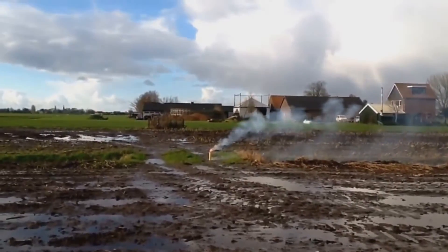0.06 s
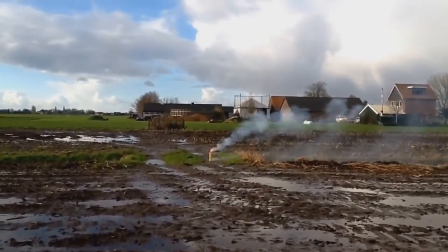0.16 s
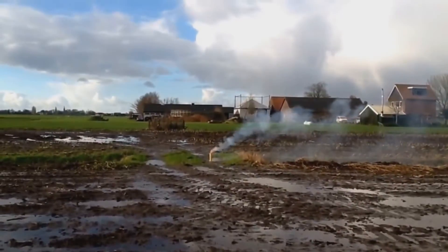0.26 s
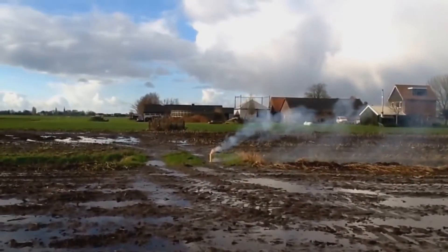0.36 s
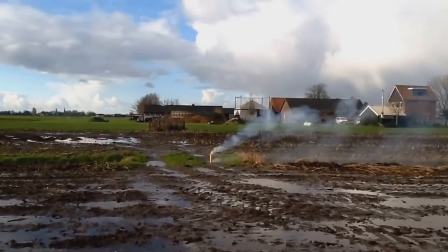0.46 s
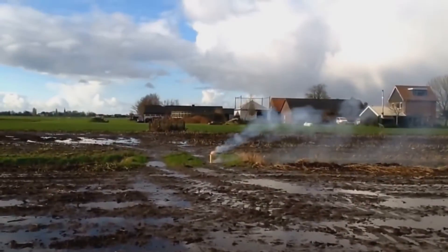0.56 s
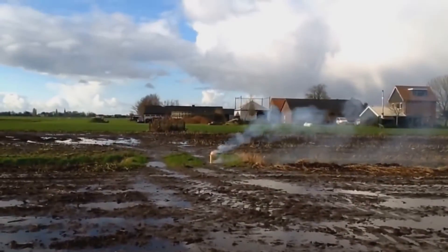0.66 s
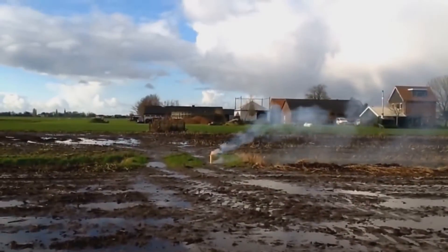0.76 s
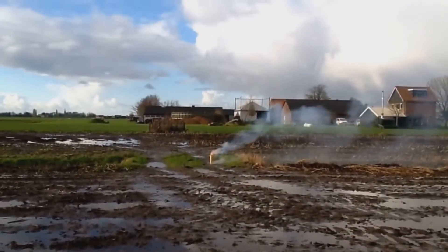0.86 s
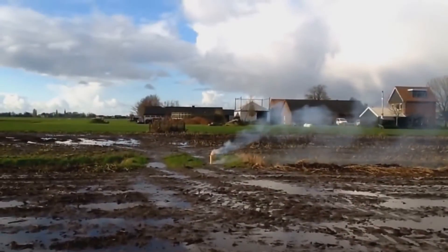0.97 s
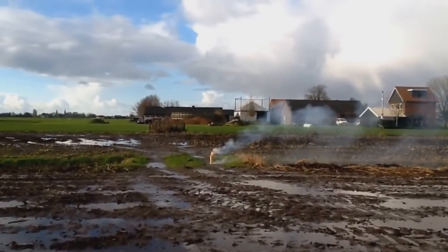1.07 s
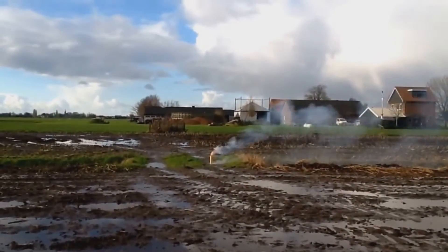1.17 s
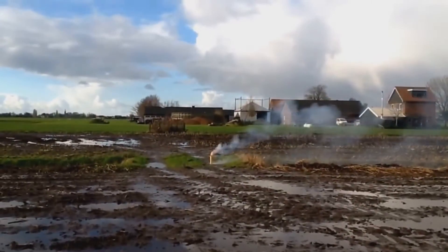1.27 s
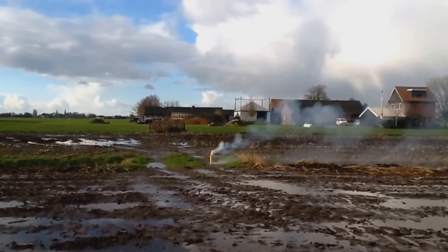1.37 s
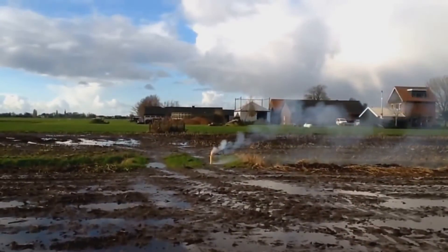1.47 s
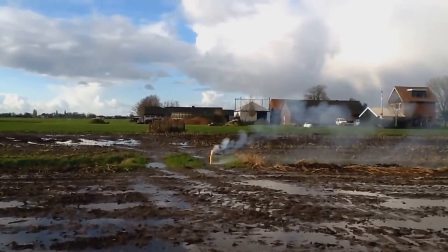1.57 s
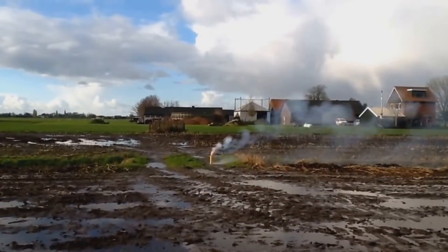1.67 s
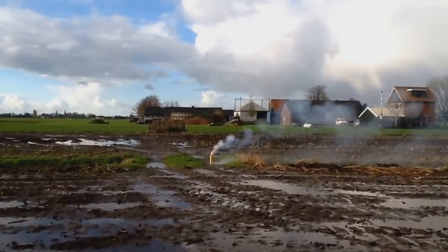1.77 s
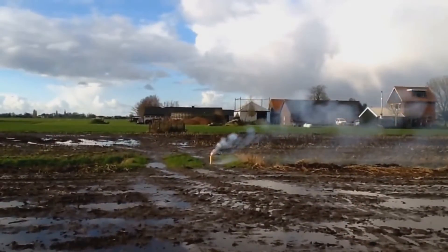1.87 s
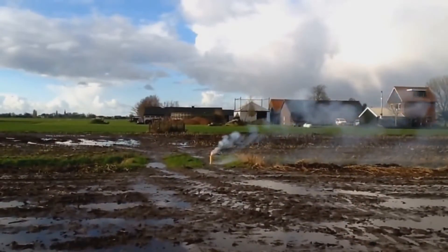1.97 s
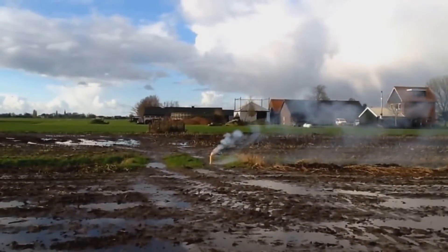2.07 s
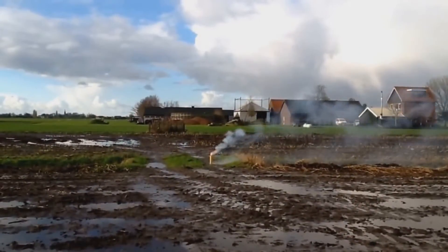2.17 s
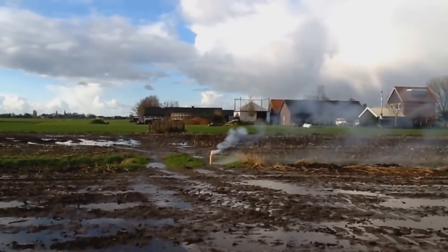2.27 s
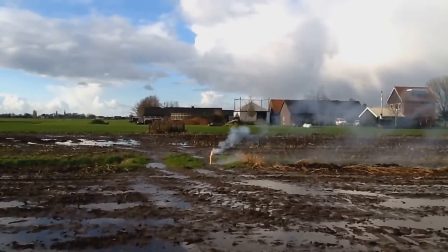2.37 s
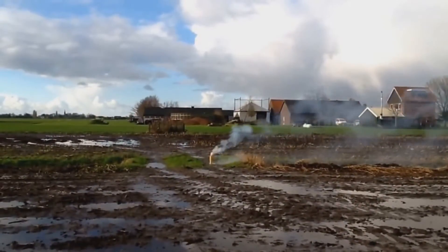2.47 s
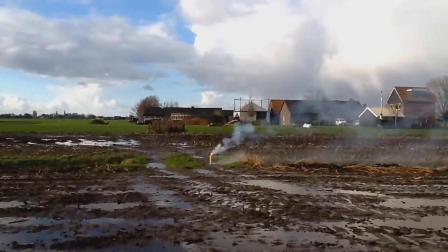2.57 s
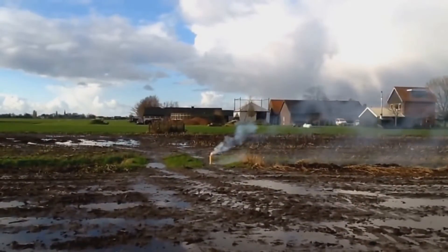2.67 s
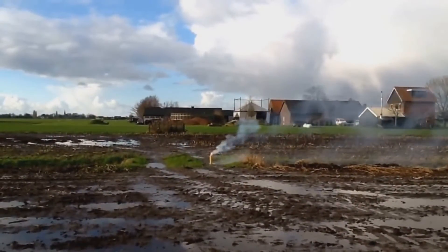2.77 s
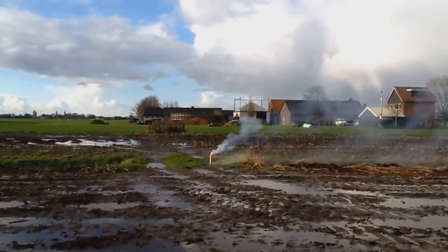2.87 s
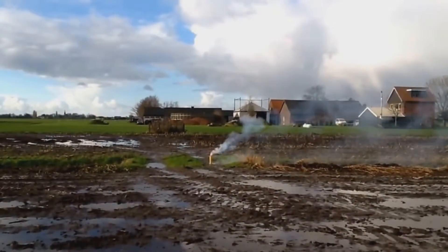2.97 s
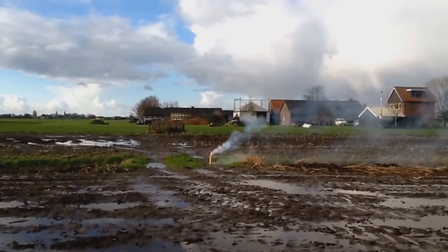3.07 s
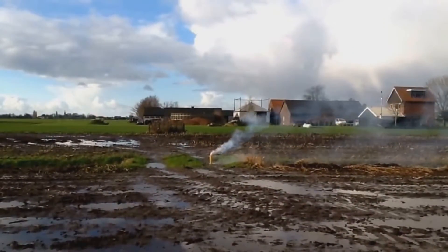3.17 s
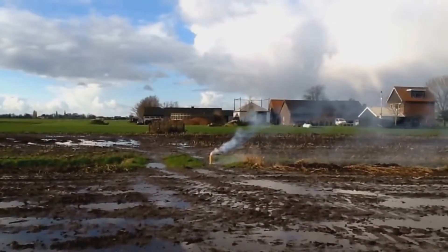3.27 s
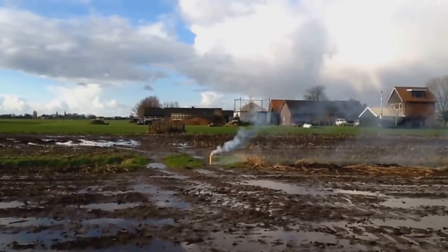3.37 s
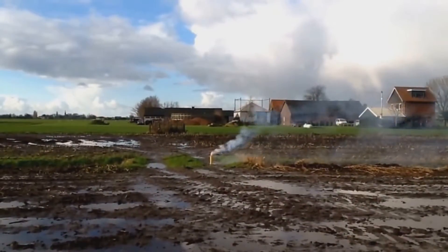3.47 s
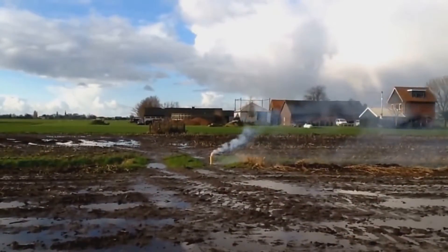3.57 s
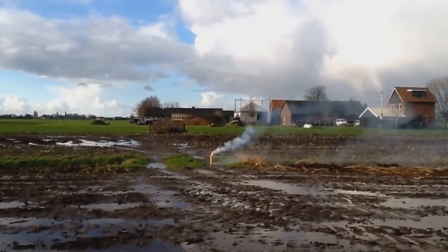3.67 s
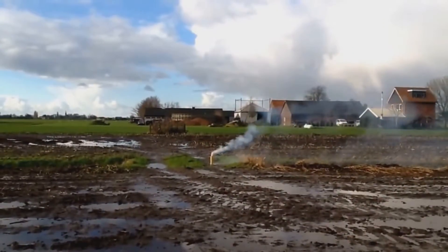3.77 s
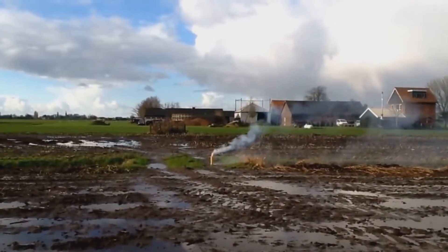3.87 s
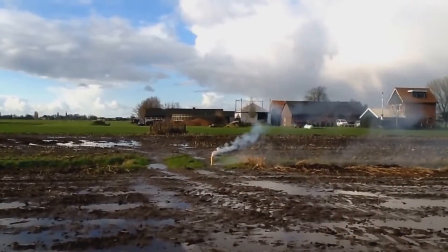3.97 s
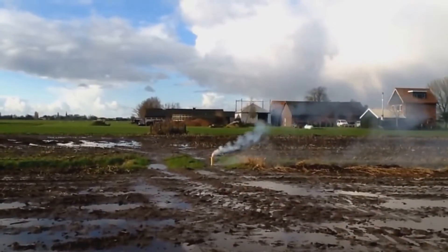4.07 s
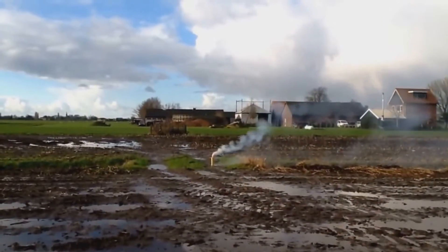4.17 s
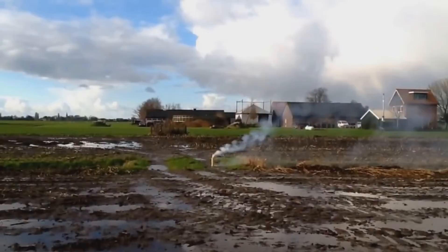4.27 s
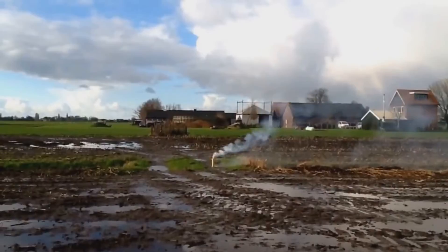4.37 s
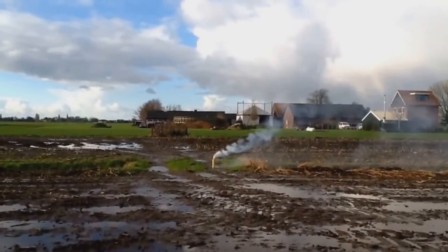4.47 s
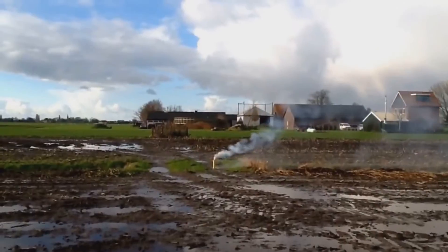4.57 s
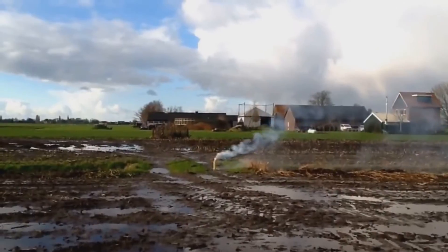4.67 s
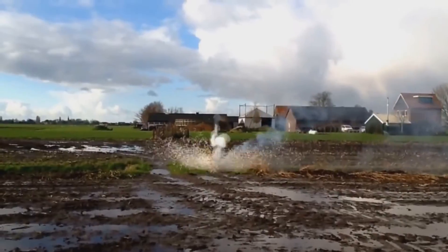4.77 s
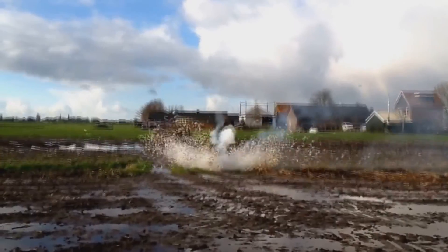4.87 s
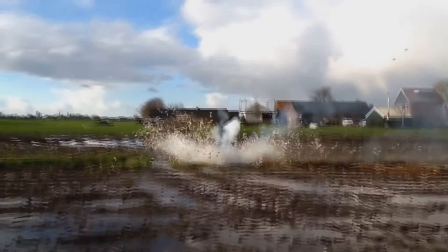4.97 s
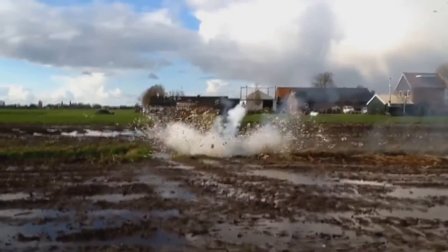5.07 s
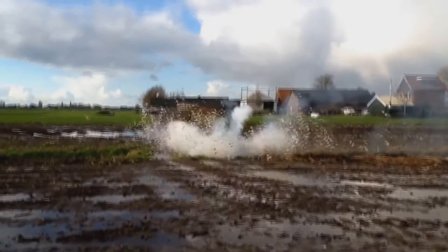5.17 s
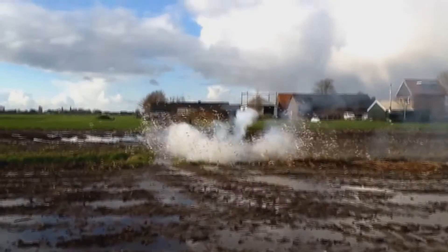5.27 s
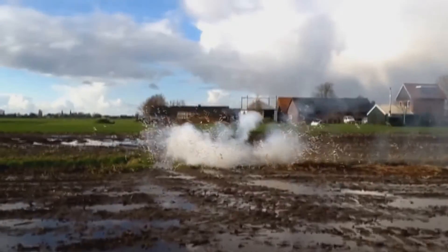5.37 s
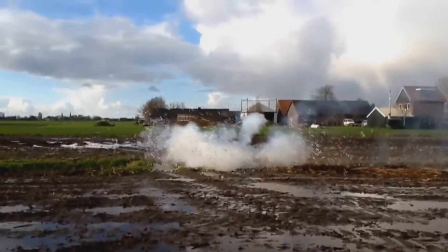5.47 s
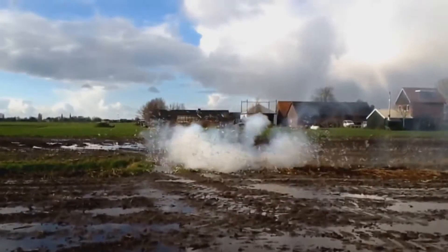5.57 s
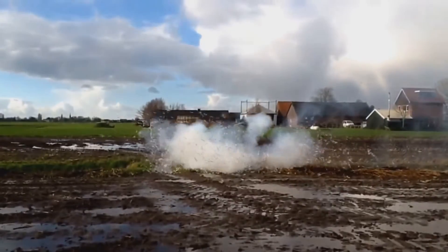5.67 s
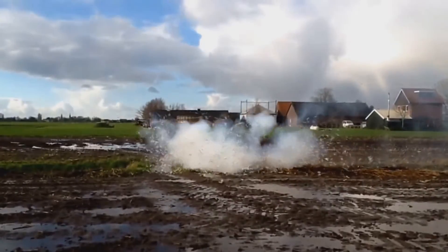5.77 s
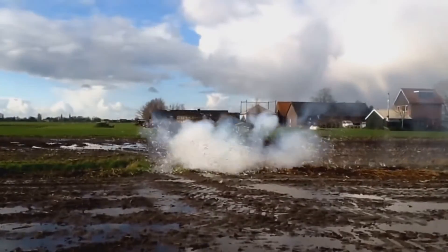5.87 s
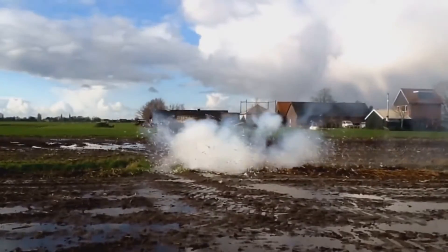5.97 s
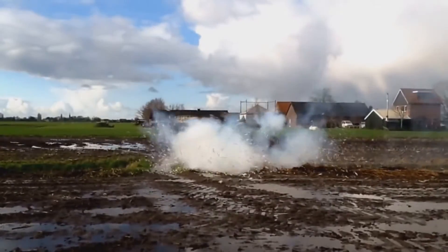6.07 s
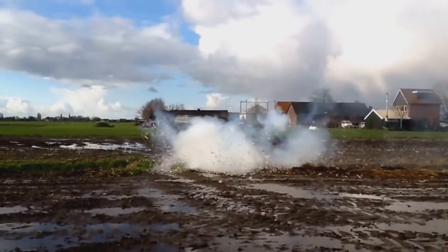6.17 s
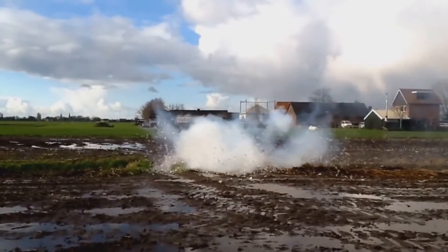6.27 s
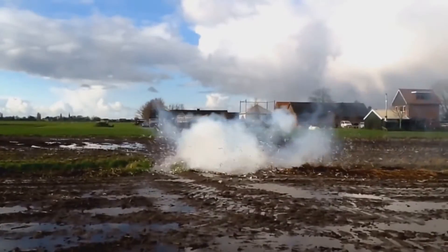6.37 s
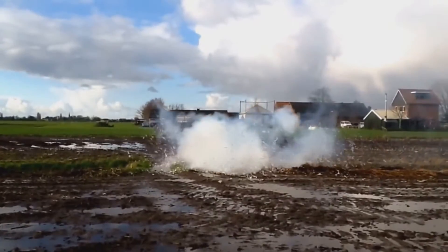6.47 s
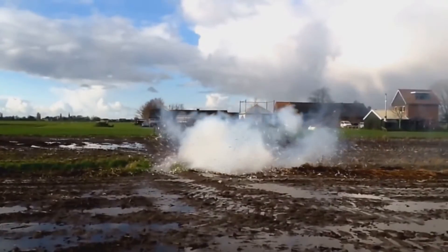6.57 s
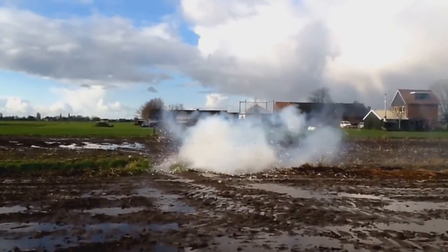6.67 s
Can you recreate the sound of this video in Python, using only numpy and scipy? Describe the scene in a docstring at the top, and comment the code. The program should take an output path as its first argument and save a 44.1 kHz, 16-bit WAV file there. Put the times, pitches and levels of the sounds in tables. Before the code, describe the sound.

From the start, the fuse of a big firecracker crackles in an open, wet field. It spits sharp, bright, irregular snaps over a fine sputter and a very soft hiss, with a faint, distant rumble underneath. The strongest snaps come between about 2.3 and 3.6 seconds. At about 4.9 seconds the crackling ends and the firecracker explodes with a single very loud crack and thump. The peak slightly overloads the small microphone, which misses the deepest bass. The blast scatters over the rough ground and quickly grows duller. From about 5.3 to 5.7 seconds a cluster of thumping, grainy echoes slaps back from farm buildings and trees, then a low roll fades over the fields. From about 6 seconds to the end, a few bits of dirt land with faint, high ticks as the roll dies away.

```python
"""A wet, open field, where a big firecracker burns over a faint, distant rumble.
Its fuse spits sharp little shock waves, each followed by its reflection from the ground.
The charge then explodes in a steep pressure front, a crack and a thump. The blast scatters off the
rough ground, slaps back from farm buildings and trees and rolls away; a few bits of dirt fall."""
import sys
import numpy as np
from scipy import signal
from scipy.fft import rfft, irfft
from scipy.io import wavfile

SR = 44100
rng = np.random.default_rng(int(sys.argv[2]) if len(sys.argv) > 2 else 0)


def to_wav(sig):
    """Store sig (one row per channel, or 1-D mono) as 16-bit WAV at the path in sys.argv[1].

    Samples outside -1..1 are clipped; the rate is SR.
    """
    pcm = np.clip(np.atleast_2d(sig), -1, 1) * 32767
    pcm = np.round(pcm).astype(np.int16)
    wavfile.write(sys.argv[1], SR, pcm.T)  # frames by channels


N = 296793
TIME = np.arange(N) / SR
BLAST_S = 4.9122

# spectrum of the distant background: f/Hz, relative density/dB
RUMBLE_SPECTRUM = [(12, -71.5), (20, -38.5), (60, -22.5), (96, -8.5), (193, 1), (367, -7.5), (422, -12.5),
                   (642, -6), (849, -14.5), (1570, -16.5), (2820, -26), (3840, -29), (10800, -33),
                   (14700, -34.5), (16000, -34.5)]
# dirt landing: t/s, peak level/dB, f/Hz
DIRT_IMPACTS = [(6.061, -32, 6100), (6.134, -43, 6100), (6.197, -41.5, 5960), (6.243, -44, 6000),
                (6.386, -41, 6000)]
# loud spits of the fuse: t/s, peak level/dB, f/Hz, damping (1/Q), ground reflection delay/s
FUSE_SPITS = [(0.0425, -27.0, 4900, 0.55, 0.00038), (0.3567, -12.5, 2100, 0.9, 0.00044),
              (0.3794, -16.0, 5800, 1.1, 0.0003), (0.6202, -11.5, 3900, 1.4, 0.00032),
              (0.6412, -14.0, 3880, 0.7, 0.00034), (0.6877, -20.0, 5800, 1.1, 0.00016),
              (0.8296, -18.0, 2800, 1.1, 0.00012), (0.937, -14.5, 10000, 1.4, 0.0002),
              (1.0722, -23.0, 6700, 1.4, 0.00028), (1.1053, -13.0, 5300, 1.8, 0.00014),
              (1.1184, -17.5, 6700, 1.8, 0.00042), (1.1558, -25.0, 6200, 1.1, 0.00014),
              (1.1796, -10.0, 10000, 2.3, 0.00024), (1.236, -23.5, 9200, 0.7, 0.00048),
              (1.2925, -20.5, 7900, 0.9, 0.00036), (1.3655, -20.0, 7300, 0.9, 0.00048),
              (1.4877, -22.0, 8500, 1.8, 0.00012), (1.501, -16.5, 6200, 1.4, 0.00042),
              (1.5895, -24.0, 7900, 1.1, 0.00014), (1.6785, -22.0, 6200, 0.7, 0.00048),
              (1.8492, -11.0, 6200, 0.7, 0.00032), (1.8813, -23.5, 5300, 1.1, 0.00014),
              (1.9363, -32.0, 1800, 0.55, 0.00052), (1.9926, -25.0, 9200, 1.1, 0.00022),
              (2.0101, -15.0, 6700, 0.7, 0.00016), (2.0647, -13.5, 7900, 0.7, 0.00016),
              (2.1489, -18.0, 8500, 0.55, 0.0003), (2.2559, -7.0, 6150, 0.87, 0.0004),
              (2.3293, -17.5, 6700, 1.8, 0.00026), (2.3507, -24.5, 7900, 0.9, 0.00016),
              (2.444, -2.5, 4600, 1.4, 0.0004), (2.4567, -13.0, 5300, 0.9, 0.00012),
              (2.4884, -16.5, 6700, 0.7, 0.00028), (2.5357, -25.5, 7900, 0.9, 0.00016),
              (2.6444, -10.0, 6200, 0.7, 0.00028), (2.6951, -24.5, 9200, 1.4, 0.0003),
              (2.9319, -8.0, 3900, 0.95, 0.00032), (3.0378, -23.0, 7900, 1.1, 0.00014),
              (3.0636, -23.0, 6700, 0.9, 0.00048), (3.0971, -12.5, 4600, 1.1, 0.00048),
              (3.142, -12.0, 3900, 1.8, 0.0004), (3.2505, 2.0, 4600, 0.7, 0.00012),
              (3.3319, -20.5, 4200, 0.9, 0.00014), (3.3663, -7.5, 6660, 0.9, 0.0004),
              (3.3719, -14.5, 6200, 0.58, 0.00036), (3.5, -4.5, 3900, 0.9, 0.00016),
              (3.5605, -8.5, 3600, 1.1, 0.00038), (3.6593, -16.0, 5300, 1.8, 0.00044),
              (3.7793, -16.5, 3600, 1.4, 0.00032), (3.8168, -20.5, 7900, 0.55, 0.00042),
              (3.8548, -20.5, 3600, 0.9, 0.0001), (3.9434, -20.5, 4900, 1.4, 0.0004),
              (3.9918, -7.5, 4900, 0.4, 0.0001), (4.0341, -24.5, 10100, 0.9, 0.00022),
              (4.3026, -18.0, 5800, 1.8, 0.00014), (4.3094, -25.5, 5300, 0.3, 0.00018),
              (4.3334, -13.0, 6200, 0.9, 0.0001), (4.3551, -17.5, 2800, 1.1, 0.0004),
              (4.412, -23.0, 4600, 1.1, 0.0001), (4.4451, -23.0, 1400, 0.3, 0.00018),
              (4.4568, -19.0, 6200, 0.9, 0.00012), (4.4781, -18.0, 10000, 2.2, 0.00042),
              (4.5692, -27.5, 9200, 1.1, 0.0003), (4.5992, -25.5, 5800, 1.1, 0.00012),
              (4.7024, -5.0, 3100, 1.8, 0.0004), (4.8201, -18.0, 3100, 0.7, 0.00012),
              (4.8731, -15.5, 9200, 0.9, 0.00048)]
# spectrum of the low roll over the fields: f/Hz, relative density/dB
ROLL_SPECTRUM = [(24, -59), (50, -42), (80, -22), (125, 1), (205, -0.5), (280, -4), (350, -14), (480, -18),
                 (640, -16), (900, -28.5), (1500, -32.5), (2500, -42), (4000, -72)]
# spectrum of the diffuse echo from the farm and its trees: f/Hz, relative density/dB
FARM_SPECTRUM = [(200, -25), (350, -0.5), (600, -11.5), (900, -12), (1900, -16), (2600, -17), (4000, -22),
                 (7000, -32.5), (10000, -44), (15000, -69)]
# bursts reflected by houses and barns: t/s, level/dB
BUILDING_ECHOES = [(5.404, -22), (5.486, -22.5), (5.572, -34), (5.633, -35), (5.682, -37.5)]
# gliding rings from ribbed walls and tiled roofs: t/s, duration/s, level/dB, start f/Hz, end f/Hz
RIB_RINGS = [(5.402, 0.023, -36, 3820, 3600), (5.423, 0.029, -28, 1852, 2255),
             (5.508, 0.032, -35, 3900, 2830), (5.635, 0.016, -40, 4050, 3560),
             (5.648, 0.037, -41, 2880, 3110)]
# spectrum of the blast scattered by nearby ground: f/Hz, relative density/dB
GROUND_SPECTRUM = [(30, -47), (60, -24), (100, -9), (150, -3), (330, -1), (480, -8.5), (700, -4),
                   (1100, -7.5), (1800, -9), (3000, -13), (6000, -16), (10600, -20), (15000, -31.5),
                   (16000, -43.5)]
# dulling with path length: f/Hz, exponent of the extra decay (negative: the band lingers)
GROUND_DECAY = [(100, -0.39), (300, -0.22), (700, -0.15), (2000, 0.16), (5000, 0.49), (10000, 0.99),
                (15000, 1.05)]
# the blast and its distinct echoes: t/s, thump level/dB, thump f/Hz, crack level/dB, crack top f/Hz
BLAST_ARRIVALS = [(4.9063, -19, 181, -4.5, 13000), (5.1143, -12, 174, -10, 7000),
                  (5.2370, -15.5, 153, -31.5, 1000), (5.319, -11, 504, -25.5, 5000),
                  (5.3725, -9, 570, -19, 1600), (5.4368, -11, 740, -12.5, 1660),
                  (5.4389, 2.5, 146, -15, 1470), (5.5098, -7, 358, -32, 3000),
                  (5.5149, -5.5, 169, -35, 3000), (5.5477, -12.5, 193, -24, 2000),
                  (5.583, -9, 218, -18.5, 794), (5.612, -21, 300, -21, 2000), (5.642, -23, 251, -18, 2400),
                  (5.645, -3.5, 167, -36, 2400), (6.056, -29, 190, -59, 700), (6.298, -31.5, 122, -65, 700)]


def from_db(db):
    """Amplitude ratio of a level in decibels."""
    return 10 ** (np.asarray(db) / 20)


def unit_rms(x):
    """Normalisation to an rms of 1."""
    return x / np.sqrt(np.mean(x ** 2) + 1e-20)


def at_hz(points, hz):
    """Interpolation of a table on a logarithmic frequency axis."""
    f, value = np.transpose(points)
    return np.interp(np.log(hz), np.log(f), value)


def cut(x, hz, kind, order=2):
    """Butterworth low-pass or high-pass filtering."""
    return signal.sosfilt(signal.butter(order, hz, kind, fs=SR, output="sos"), x)


def noise(spectrum):
    """Spectral shaping of white noise, rms 1."""
    hz = np.arange(N // 2 + 1) * SR / N + 1
    return unit_rms(irfft(rfft(rng.standard_normal(N)) * from_db(at_hz(spectrum, hz)), N))


def waver(hz):
    """Random fluctuation of rms 1, interpolated between hz values a second."""
    knots = rng.standard_normal(int(N / SR * hz) + 2)
    return unit_rms(np.interp(TIME * hz, np.arange(len(knots)), knots))


def bands(x, edges):
    """Zero-phase separation into adjacent bands: yields (top edge/Hz, band)."""
    for hz in edges:
        band = signal.sosfiltfilt(signal.butter(6, hz, fs=SR, output="sos"), x)
        x = x - band
        yield hz, band


def add(out, s, sound):
    """Linear superposition of a sound starting at time s."""
    start = int(round(s * SR))
    out[start:start + len(sound)] += sound[:N - start]


def echo_shape(start_s, attack_s, hold_s, fall_db_per_s, knee_s=1, power=0):
    """Linear rise and hold, then exponential decay times a power law past the knee."""
    rise = np.clip((TIME - start_s) / attack_s, 0, 1)
    age = np.maximum(TIME - start_s - attack_s - hold_s, 0)
    return rise * from_db(-fall_db_per_s * age) * (1 + age / knee_s) ** -power


def distant_rumble(level_db=-53):
    """Stationary noise, strongest in the bass, forms the background."""
    return from_db(level_db) * noise(RUMBLE_SPECTRUM)


def snap(hz, damping, body_share, bounce_s, bounce_share, body_hz=900):
    """A tiny shock, a damped swing with a slower recovery, interferes with its ground reflection."""
    t = np.arange(256) / SR
    phase, slow = 2 * np.pi * hz * t, 2 * np.pi * body_hz * t
    wave = -np.cos(phase) * np.exp(-phase * damping / 2) - body_share * (1 - slow) * np.exp(-slow)
    wave[0] /= 2   # the front falls on the first sample
    wave = wave + bounce_share * np.interp(t - bounce_s, t, wave, left=0)
    wave = cut(cut(wave, 400, "high"), 12500, "low")
    return wave / np.abs(signal.hilbert(wave)).max()


def snaps(rows, rubble_db=-14, rubble_s=0.0019, rubble_hz=2000):
    """Scattering by nearby soil colours each snap differently; a row is t/s, level/dB, snap's shape."""
    out, t = np.zeros(N), np.arange(256) / SR
    rubble = rng.standard_normal((len(rows), len(t))) * t * np.exp(-2 * t / rubble_s)
    for (s, db, *shape), lumps in zip(rows, cut(rubble, rubble_hz, "high")):
        paths = from_db(rubble_db) * lumps / np.linalg.norm(lumps) + (t == 0)
        add(out, s, from_db(db) * np.convolve(snap(*shape), paths))
    return out


def clod_scatter(x, tail_db=-11.5, knee_s=.0016, length_s=0.082, top_hz=9000, uneven_db=6.0):
    """Diffuse reflection from clods and ruts adds a fading spray of tiny, duller echoes."""
    t = np.arange(int(length_s * SR)) / SR
    sign, size = rng.standard_normal((SR // 2, 2))[:len(t)].T
    spray = cut(sign * from_db(uneven_db * size), top_hz, "low", order=1)
    spray *= (1 - t / length_s) / (1 + t / knee_s)
    return x + from_db(tail_db) * signal.fftconvolve(x, spray / np.linalg.norm(spray))[:N]


def falling_dirt(crumb_db=-52, spread_db=5, crumbs_from_s=6.7, count=14):
    """The impact of each thrown-up bit radiates a tick; finer crumbs land last."""
    crumbs = [(crumbs_from_s + when * (TIME[-1] - crumbs_from_s),
               crumb_db + spread_db * size, 4000 + 4000 * pitch)
              for when, size, pitch in rng.random((count, 3))]
    shape = (1.2, .1, .0003, .3)   # damping, body share, bounce delay/s, bounce share
    return clod_scatter(snaps([(s, db, hz, *shape) for s, db, hz in list(DIRT_IMPACTS) + crumbs]))


def spits(weak_db=-35, range_db=8, weak_hz=7000, longest_bounce_s=.0006, count=16):
    """Loud spits and weak random ones; path difference delays the reflection of a higher spark more."""
    weak = [(when * BLAST_S, weak_db + range_db * (size - .5), weak_hz * 2 ** (pitch - .5),
             .8, longest_bounce_s * height)
            for when, size, pitch, height in rng.random((count, 4))]
    body_share, bounce_share = .06, .45
    return snaps([(s, db, hz, damping, body_share, bounce_s, bounce_share)
                  for s, db, hz, damping, bounce_s in list(FUSE_SPITS) + weak])


def fuse(grain_db=-48, spread_db=4.5, grain_hz=7500, hiss_db=-70, count=190):
    """Combustion of the powder radiates a fine sputter and hiss beneath the spits until the blast."""
    sputter = [(when * BLAST_S, grain_db - spread_db * np.log(size + 0.027),
                grain_hz * 2 ** (pitch - .5), 1, .1, 0.00049 * height, .5)
               for when, size, pitch, height in rng.random((count, 4))]
    hiss = unit_rms(cut(cut(rng.standard_normal(N), 5000, "high"), 10000, "low"))
    return clod_scatter(spits() + snaps(sputter)) + from_db(hiss_db) * hiss * (TIME < BLAST_S)


def low_roll(field_db=-26.5, farm_db=-25.0, uneven_db=1.6, uneven_hz=28):
    """Reverberation: bass returns unevenly from the field, then the farm, and outlasts other echoes."""
    field = from_db(field_db) * echo_shape(4.96, attack_s=0.097, hold_s=.1, fall_db_per_s=22)
    farm = from_db(farm_db) * echo_shape(5.41, attack_s=.08, hold_s=.14, fall_db_per_s=3,
                                         knee_s=.2, power=2.05)
    uneven = from_db(uneven_db * np.clip(waver(uneven_hz), -2, 1))
    return np.hypot(field, farm) * uneven * noise(ROLL_SPECTRUM)


def farm_envelope(trees_db=-34.5):
    """Incoherent addition: a long return from the trees and a burst from each building sum in power."""
    trees = from_db(trees_db) * echo_shape(5.385, attack_s=.02, hold_s=.245, fall_db_per_s=75)
    walls = [from_db(db) * echo_shape(s, attack_s=0.01, hold_s=0.0023, fall_db_per_s=264)
             for s, db in BUILDING_ECHOES]
    return np.linalg.norm([trees] + walls, axis=0)


def farm_echo(patchy_db=2.5, patchy_hz=45, grain_db=1.5, grain_hz=500, loss_db_per_khz_s=0.5):
    """Walls, roofs and trees scatter a grainy wash of shifting colour; air absorption dulls it."""
    travel_s = np.clip(TIME - 5.0, -.2, .5)
    wash = sum(band * from_db(patchy_db * waver(patchy_hz) - loss_db_per_khz_s * travel_s * hz / 1000)
               for hz, band in bands(noise(FARM_SPECTRUM), np.geomspace(600, 18000, 22)))
    grain = unit_rms(from_db(grain_db * waver(grain_hz)))
    return farm_envelope() * wash * grain


def rib_echoes(scatter_hz=450):
    """Repetition pitch: evenly spaced ribs return a quick, uneven echo train, heard as a rough ring."""
    out = np.zeros(N)
    for s, length_s, db, start_hz, end_hz in RIB_RINGS:
        along = np.linspace(0, 1, int(length_s * SR))
        phase = 2 * np.pi * np.cumsum(start_hz + (end_hz - start_hz) * along) / SR
        strength = (1 + waver(scatter_hz) + 1j * waver(scatter_hz))[:len(along)] / np.sqrt(2)
        add(out, s, from_db(db) * np.sin(np.pi * along) * np.real(strength * np.exp(1j * phase)))
    return out


def ground_scatter(level_db=-8.8, knee_s=0.036, lead_s=.003):
    """Backscatter arrives from ever farther ground, weaker and duller as its path grows."""
    path_ratio = np.hypot(1, np.maximum(TIME - BLAST_S, 0) / knee_s)
    wash = sum(band * path_ratio ** -at_hz(GROUND_DECAY, hz / 2 ** (1 / 3))
               for hz, band in bands(noise(GROUND_SPECTRUM), np.geomspace(120, 18000, 12)))
    envelope = echo_shape(BLAST_S - lead_s, attack_s=0.0033, hold_s=.027, fall_db_per_s=54,
                          knee_s=.007, power=.28)
    return from_db(level_db) * envelope * wash


def blast_waves(thump_rise_cycles=0.37, crack_cycles=7.0, front_db=1.0, front_s=.0003):
    """A shock wave and its reflections: each is a steep front, a ragged crack and a damped thump."""
    out, t = np.zeros(N), np.arange(SR // 10) / SR
    for s, thump_db, thump_hz, crack_db, top_hz in BLAST_ARRIVALS:
        age = t * thump_hz / thump_rise_cycles
        thump = -np.sin(2 * np.pi * thump_hz * t) * age * np.exp(1 - age)
        front = cut((t / front_s - 1) * np.exp(-t / front_s), top_hz, "low")
        crack = unit_rms(cut(rng.standard_normal(len(t)), top_hz, "low", order=3))
        crack *= np.exp(-(t * top_hz / crack_cycles) ** 2)   # duller cracks last longer
        add(out, s, from_db(thump_db) * thump + from_db(crack_db) * (crack + from_db(front_db) * front))
    return out


def scene():
    """All sources superpose at one small microphone, which misses the blast's deepest bass."""
    blast = cut(blast_waves(), 120, "high", order=3) + cut(ground_scatter(), 94, "high")
    far_echoes = low_roll() + farm_echo() + rib_echoes()
    return (distant_rumble() + falling_dirt() + fuse() + far_echoes + blast)[None]


def record(dry, ceiling=.86, cutoff_hz=15600):
    """Saturation of the input rounds the loudest peaks; a steep low-pass removes the highest treble."""
    clipped = dry / (1 + (dry / ceiling) ** 10) ** (1 / 10)
    return signal.sosfilt(signal.ellip(10, .1, 80, cutoff_hz, fs=SR, output="sos"), clipped)


dry = scene()
out = record(dry)
to_wav(out)
```